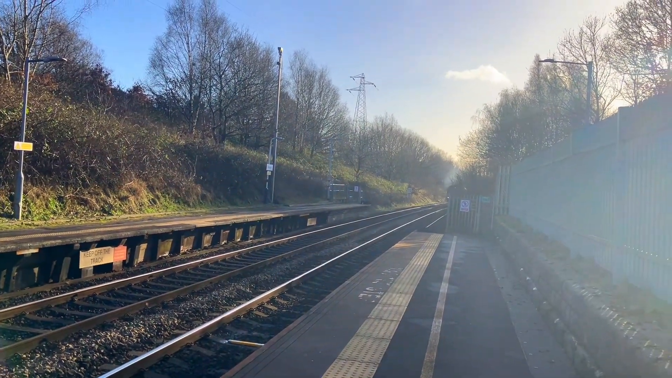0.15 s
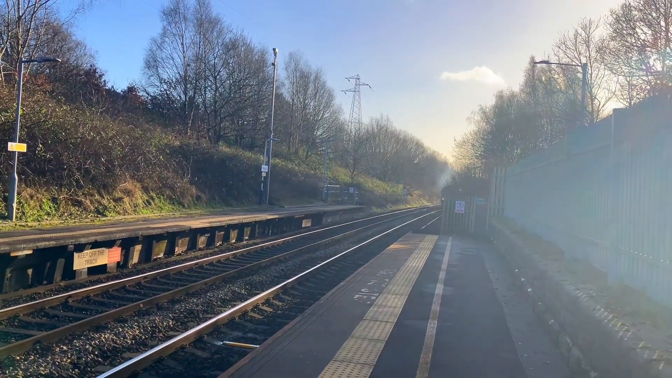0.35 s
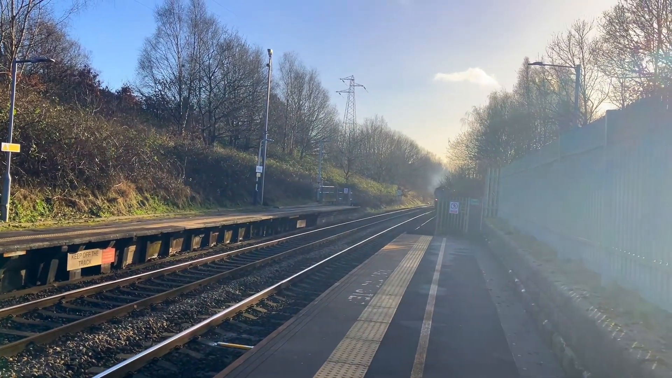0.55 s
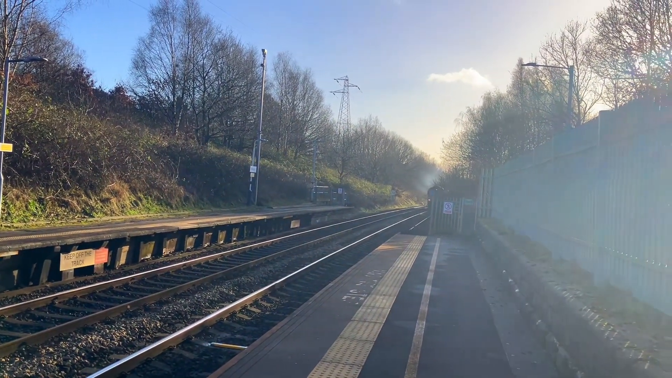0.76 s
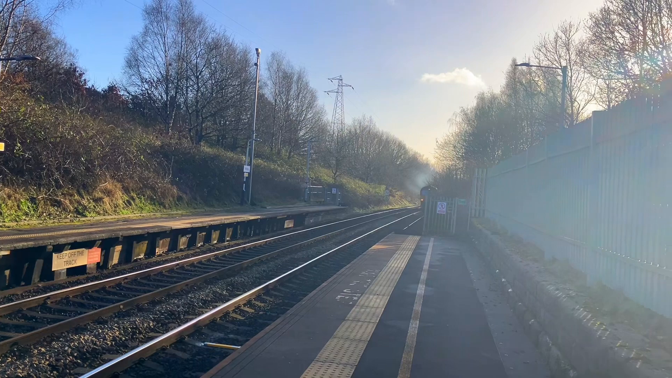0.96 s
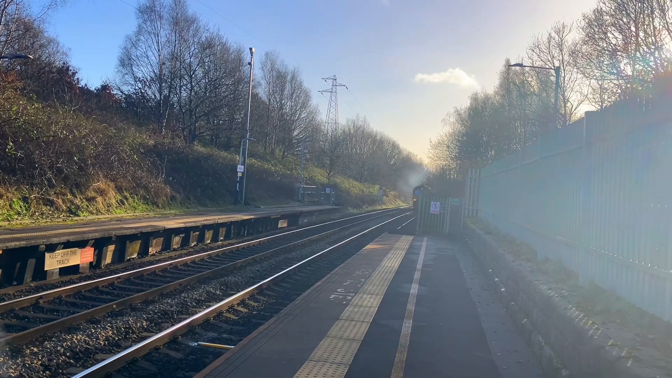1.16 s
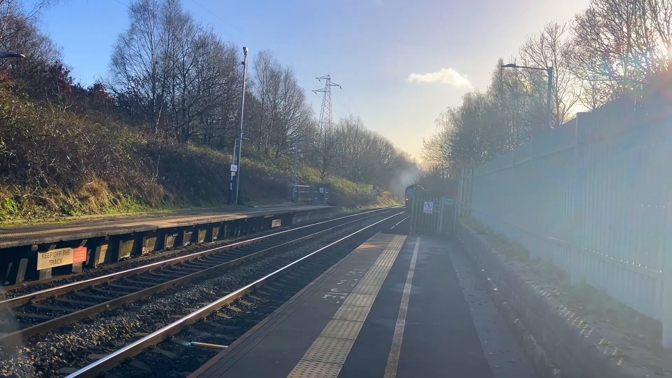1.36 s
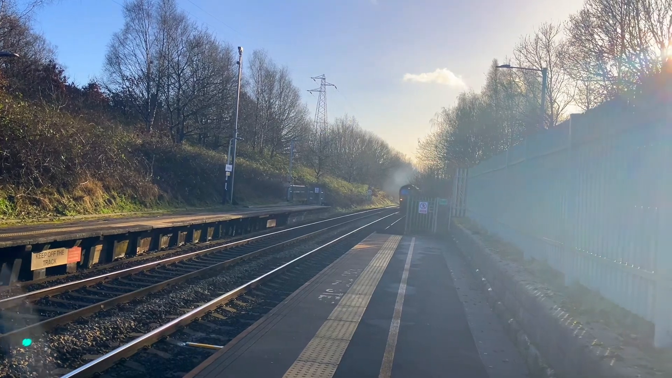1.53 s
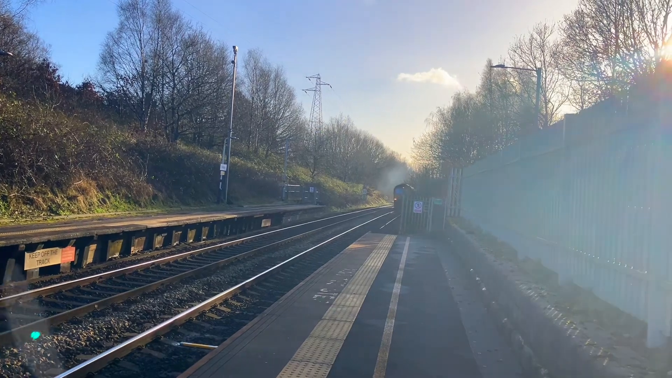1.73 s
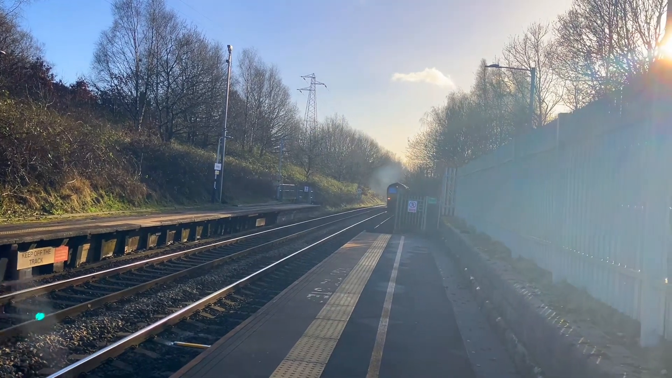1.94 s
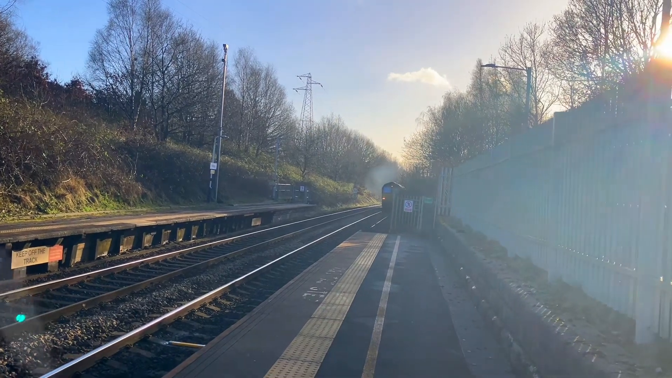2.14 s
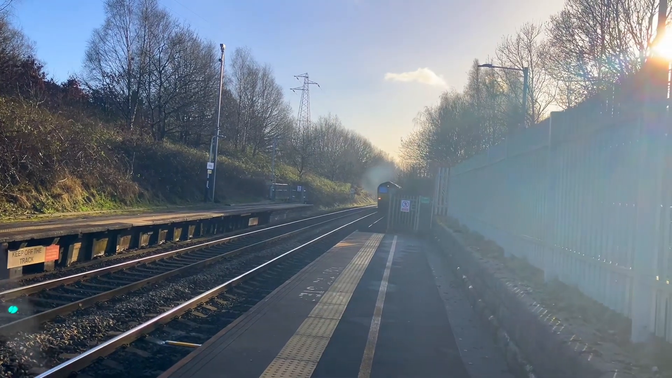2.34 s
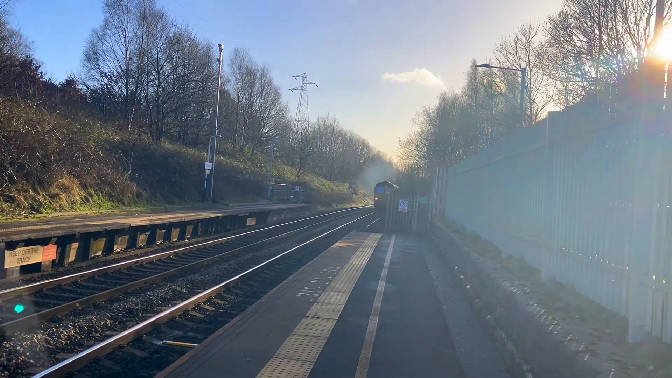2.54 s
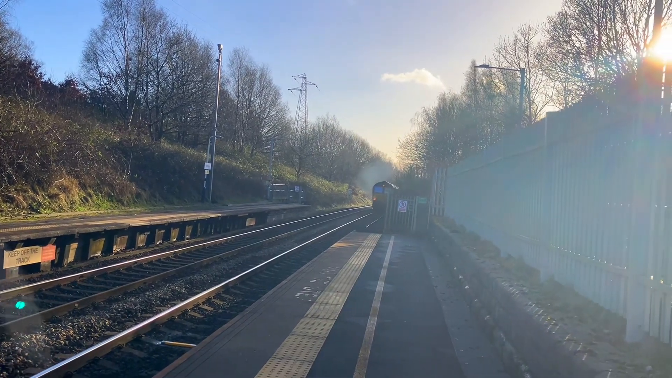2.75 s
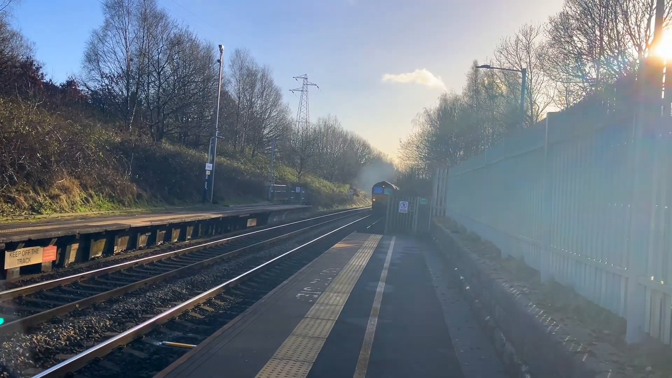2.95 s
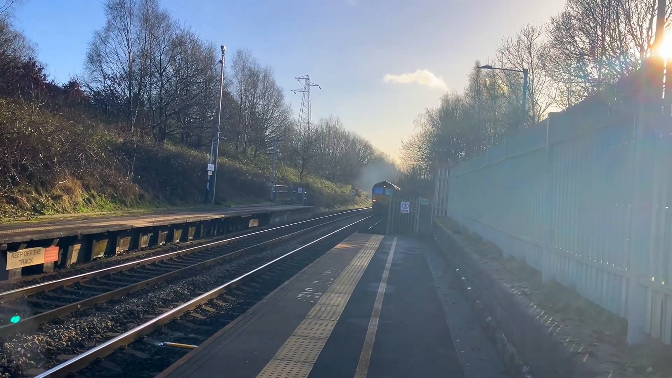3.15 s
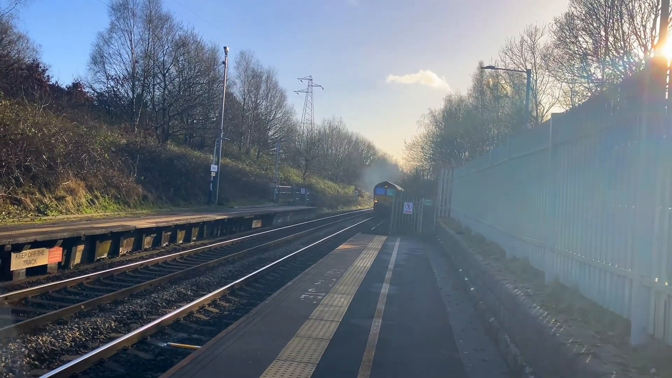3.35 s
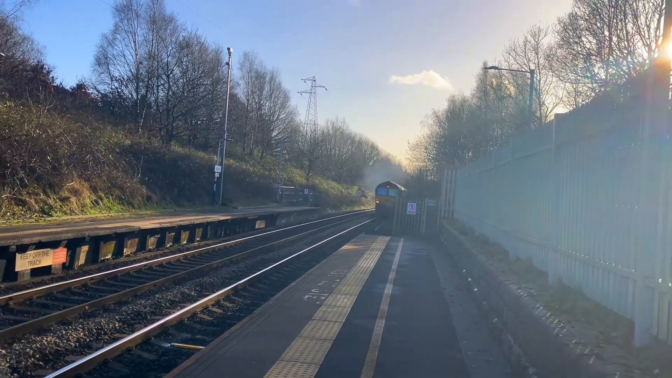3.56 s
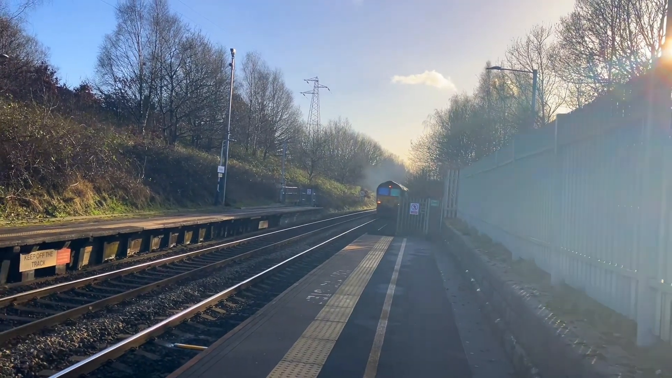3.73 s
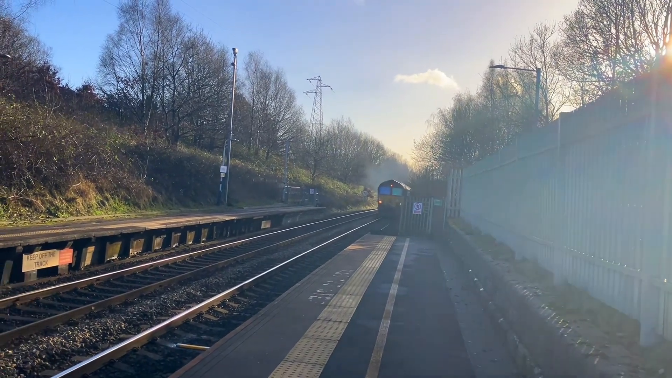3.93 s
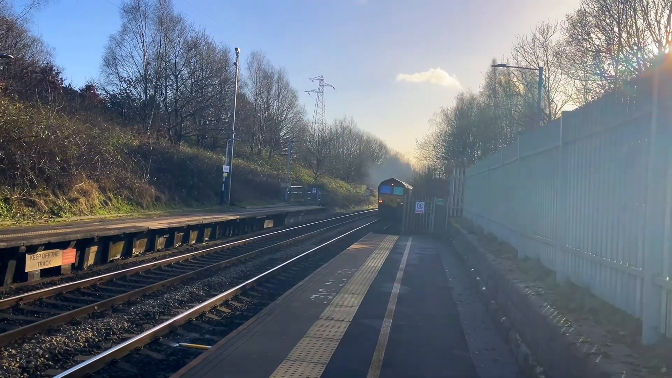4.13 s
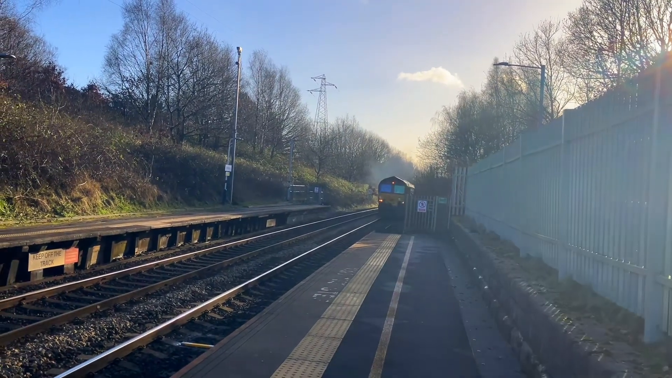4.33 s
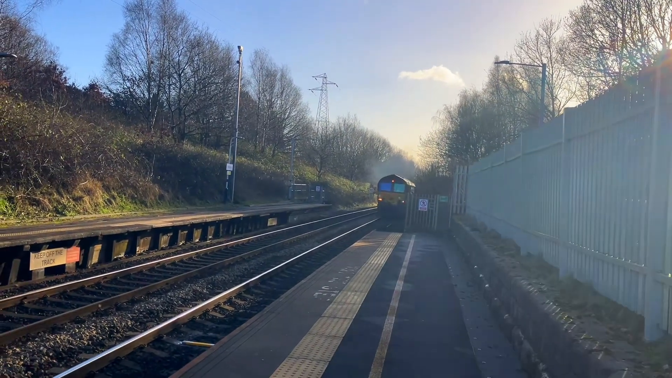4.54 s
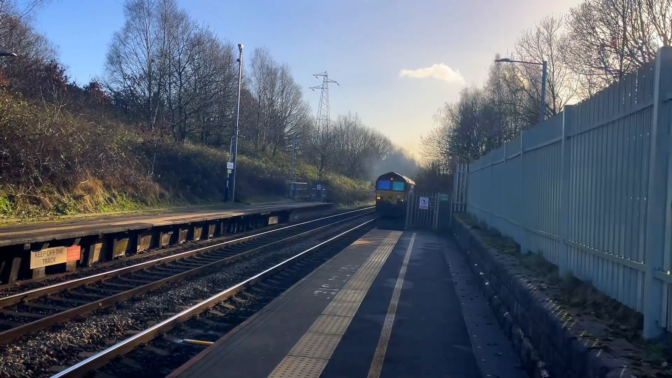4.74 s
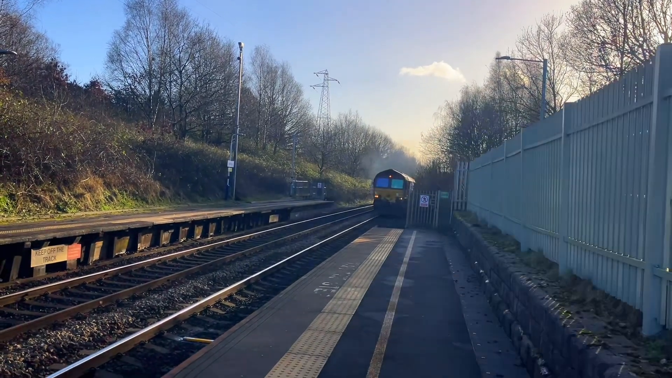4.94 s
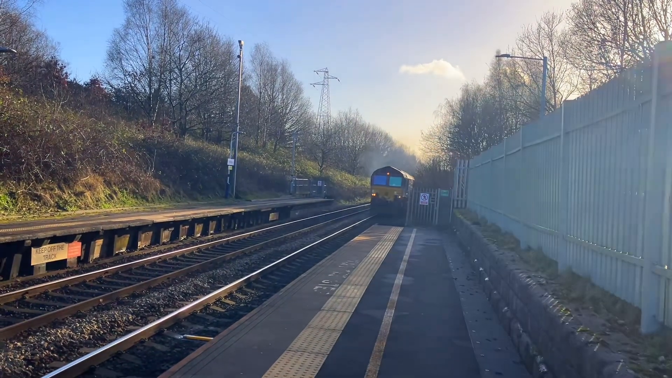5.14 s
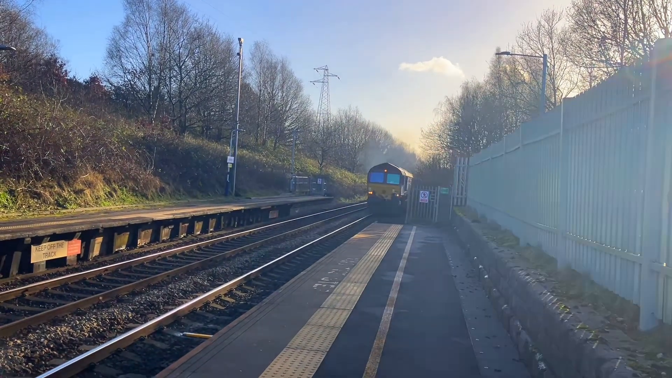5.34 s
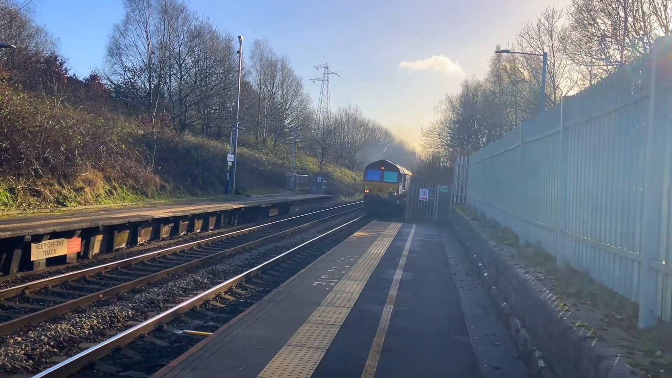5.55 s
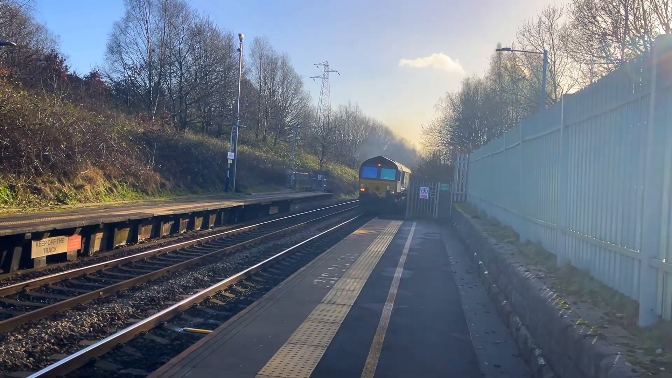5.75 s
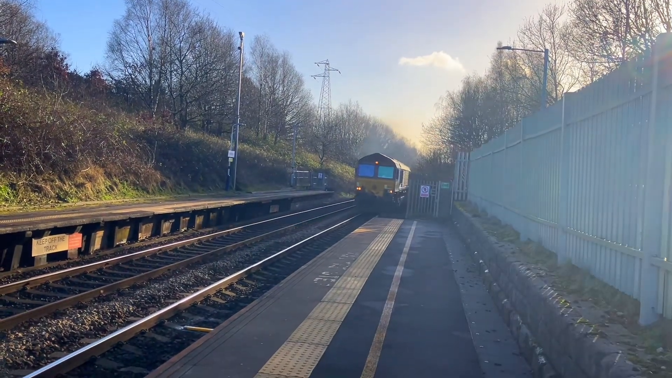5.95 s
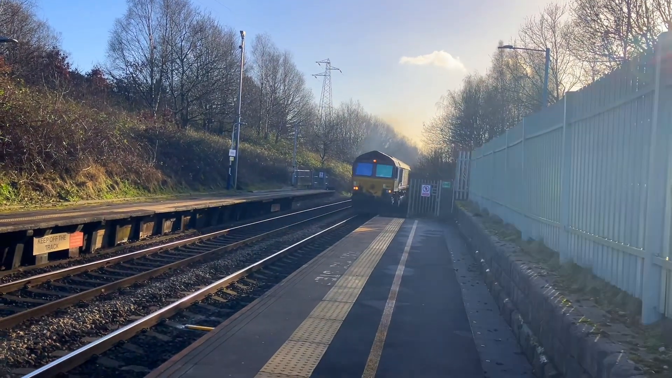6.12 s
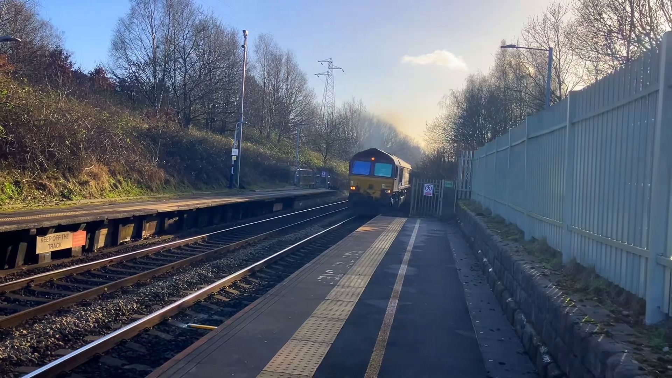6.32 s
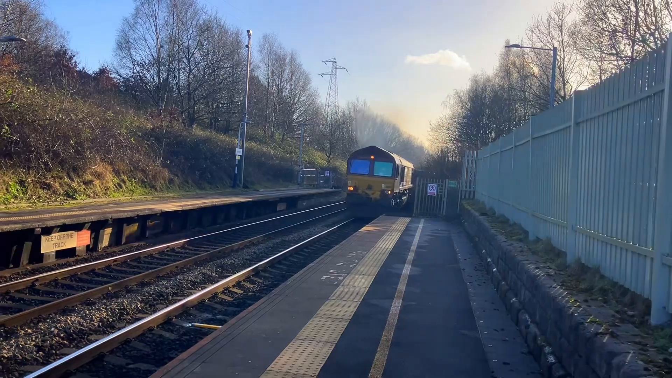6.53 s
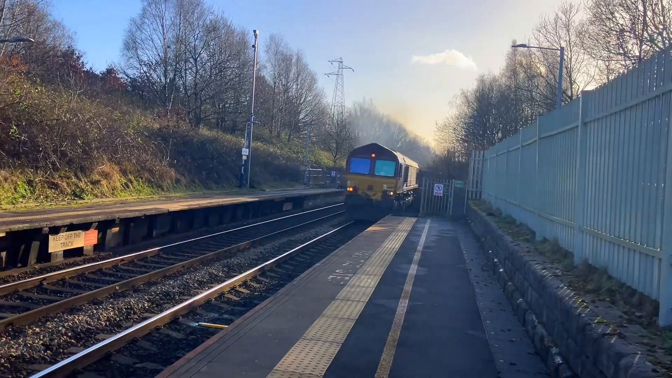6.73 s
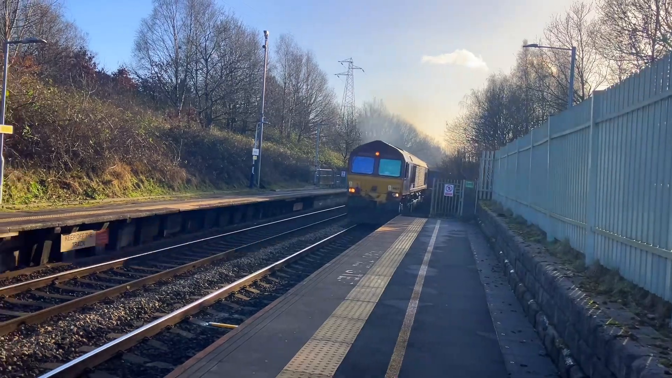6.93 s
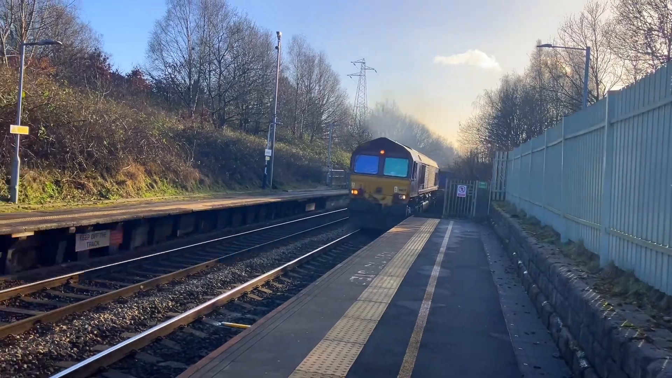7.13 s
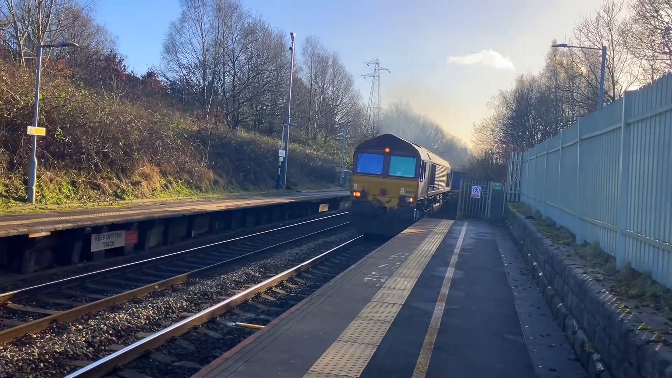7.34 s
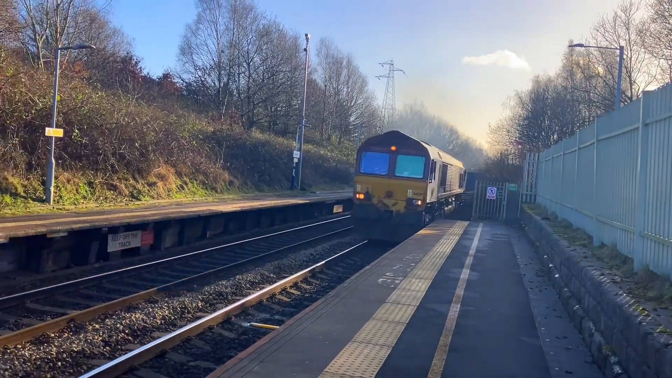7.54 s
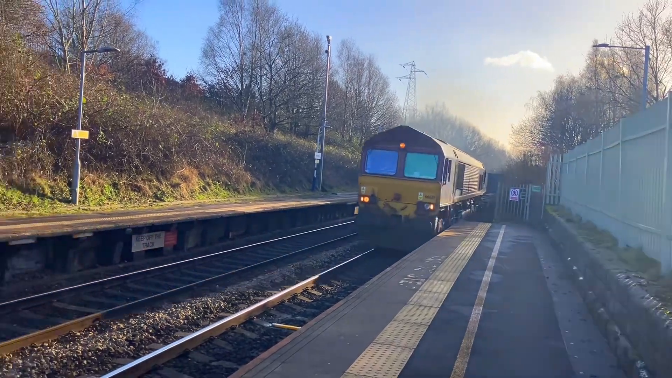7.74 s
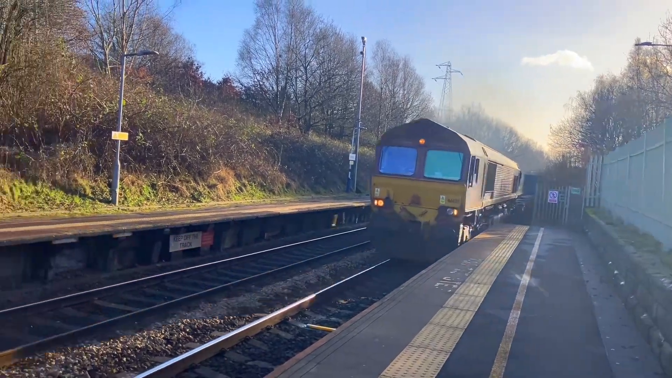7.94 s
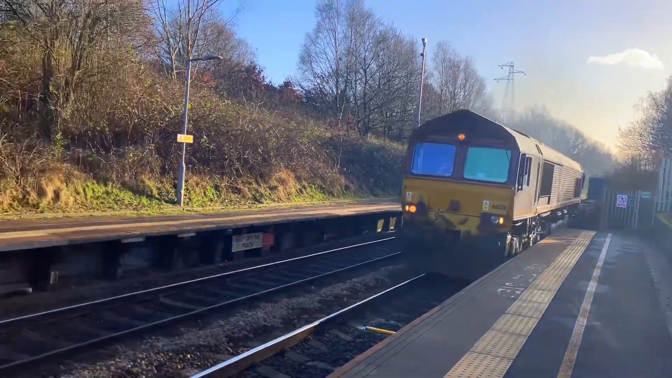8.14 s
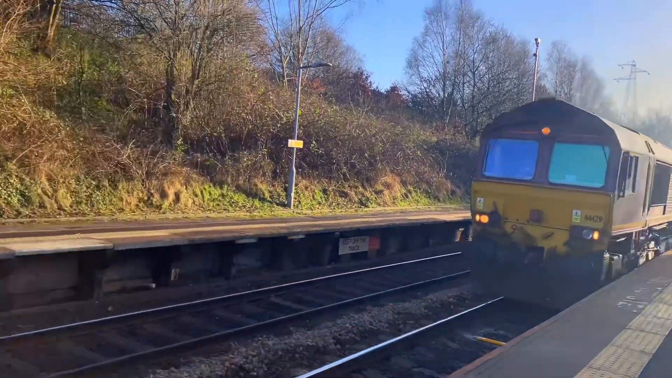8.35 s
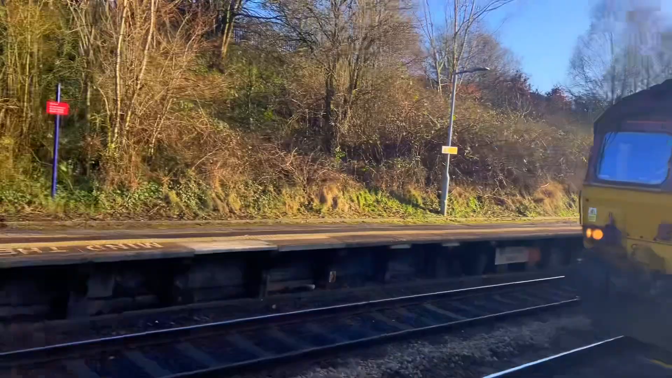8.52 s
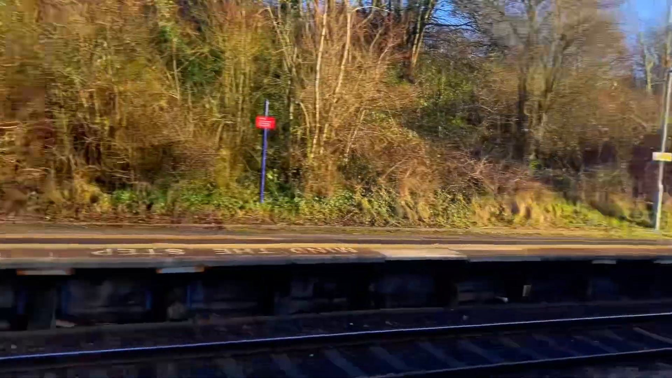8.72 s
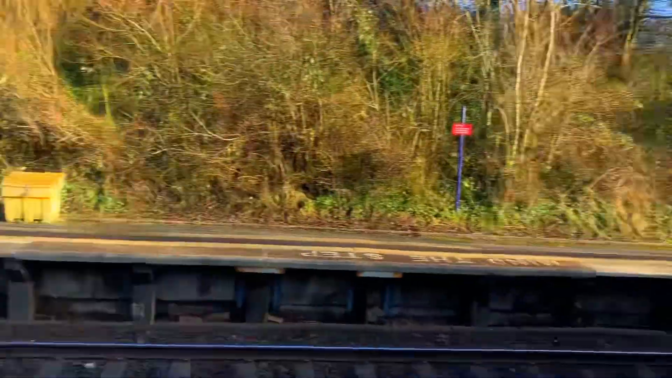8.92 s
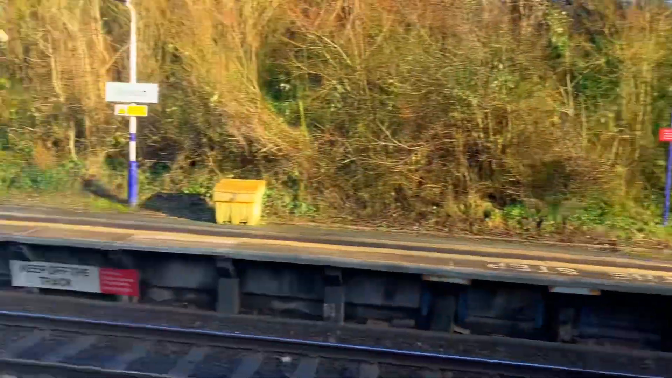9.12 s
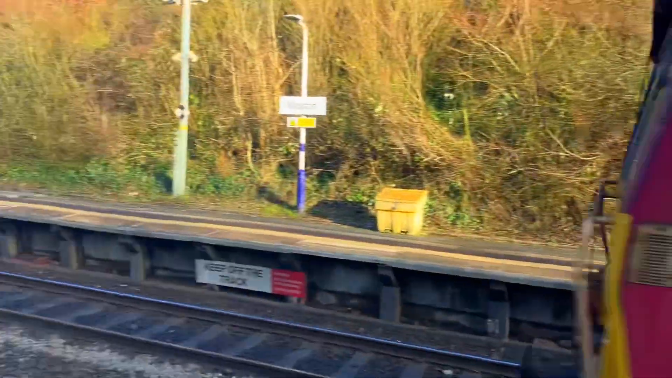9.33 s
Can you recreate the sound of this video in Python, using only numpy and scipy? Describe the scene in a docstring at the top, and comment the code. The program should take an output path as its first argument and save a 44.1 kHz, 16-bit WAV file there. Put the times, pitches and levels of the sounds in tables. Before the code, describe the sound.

A heavy diesel pulls hard toward a handheld stereo microphone on an open platform. It starts quiet and scattered by the banks, a fast low pulsing with soft high rail ringing. Over nine seconds it swells, with unsteady mid-pitched whines, a small spit of air and two tiny ticks. Near the end a soft low gust, rough wheel roar, grinding and sizzling hiss surround the powerful bass drone as it passes.

```python
"""A two-stroke diesel freight locomotive, pulling hard, runs through a cutting up to a phone on a platform.
Its exhaust throbs once per crank turn: a sum of waves at multiples of the crank rate over a gas rumble.
The blower, gears and high whines are unsteady tones; wheels, bogies and cooling fans are shaped noise.
Singing rails, steady hums, brief tone swells, a gust, a spit of air and small ticks add detail.
Far off the banks scatter the sound; close by it grows brighter and swings to the right."""
import sys
import numpy as np
from scipy import signal
from scipy.fft import rfft, irfft
from scipy.io import wavfile
from scipy.ndimage import uniform_filter1d, minimum_filter1d, map_coordinates

SR = 44100
rng = np.random.default_rng(int(sys.argv[2]) if len(sys.argv) > 2 else 0)


def bounce(signal):
    """Save signal as a 16-bit WAV file at the path given by the first command-line argument."""
    frames = np.transpose(np.atleast_2d(signal))
    limited = np.clip(frames, -1, 1)
    pcm = np.round(limited * 32767).astype(np.int16)
    wavfile.write(sys.argv[1], SR, pcm)


N = 413658
T = np.arange(N) / SR  # time of each sample, s
FREQS = np.arange(N // 2 + 1) * SR / N  # frequencies of the spectrum, Hz

# In all spectra the level is relative: the noise made from them is scaled to rms 1.
# exhaust waves heard from ahead and from the side, before scaling to total power 1: crank order, level/dB
EXHAUST_AHEAD = [(2, -22), (3, -11.5), (4, -5.5), (5, 0), (6, -1), (7, -23.5), (8, -18), (9, -6),
                 (10, -13.5), (11, -28), (12, -12)]
EXHAUST_BESIDE = [(2, -38), (3, -18), (4, -13), (5, -3.5), (6, -2), (7, -2.5), (8, -14), (9, -9.5),
                  (10, -12), (11, -17), (12, -24)]
# one exhaust wave booms out or sinks in the cutting: t/s, length/s, crank order, change of level/dB
EXHAUST_BOOMS = [(0.33, 0.37, 5, 2), (6.5, 1.45, 6, 4.5), (6.36, 0.88, 7, 21), (6.2, 0.95, 5, -7),
                 (6.3, 0.78, 8, -5), (6.99, 0.96, 9, 10), (8.28, 0.43, 5, 7), (9.25, 0.17, 7, 5.5)]
# loudness of the exhaust throb over time: t/s, level/dB
THROB_LEVEL = [(0, -34), (0.45, -33), (0.9, -31.5), (2.5, -30.5), (3.3, -29), (4.25, -26), (4.45, -28.5),
               (4.7, -24), (5.3, -22.5), (5.7, -22.5), (6.05, -21.5), (6.45, -23), (6.9, -18), (7.5, -17.5),
               (8.4, -14), (8.6, -17), (9.05, -8.5), (9.38, -9)]
# single turns that fire harder or weaker: t/s, change of level/dB
FIRING_SURGES = [(.45, -7), (1.0, 1.5), (1.6, 0.5), (2.63, 2.5), (3.69, 1.5), (4.68, 3), (6.02, 0),
                 (8.81, -3.5)]
# spectrum of the exhaust's gas rumble: f/Hz, level/dB
GAS_RUMBLE = [(15, -36), (28, -23), (42, 0.5), (70, 12), (100, 9.5), (150, -2), (220, -4.5), (400, -129)]
# spectrum of the exhaust's rasp: f/Hz, level/dB
EXHAUST_RASP = [(90, 0.5), (150, 0.5), (220, 6), (350, 2), (420, -7.5), (600, -8.5), (1200, -93.5)]
# partials of the blower: multiple of its pitch, relative level/dB
BLOWER_PARTIALS = [(1, 3.5), (2, -8), (3, -16.5), (3.5, -24), (4, -12.5)]
# pitch of the blower as heard, sinking as it draws near: t/s, f/Hz
BLOWER_PITCH = [(0, 296.1), (6.4, 296.1), (7.5, 294.8), (8.2, 293.2), (9.38, 292.4)]
# loudness of blower, gears and the two thin whines over time: t/s, level/dB
BLOWER_LEVEL = [(0, -52), (2.8, -53.5), (4.4, -43.5), (5.25, -37.5), (5.55, -42), (5.8, -36), (6.5, -35.5),
                (6.8, -38.5), (7.15, -33.5), (7.602, -34), (7.92, -25.5), (8.12, -33), (8.35, -29.5),
                (8.67, -18.5), (8.79, -26.5), (9.05, -18), (9.38, -31)]
GEAR_LEVEL = [(0, -62), (2.7, -58), (3.1, -55), (4.6, -57), (5.0, -43.5), (5.4, -46.5), (5.85, -52),
              (6.2, -42), (6.45, -49), (6.8, -39.5), (7.521, -35.5), (7.65, -38), (7.82, -32.5),
              (8.15, -32), (8.42, -38.5), (8.7, -31), (9.1, -32), (9.38, -33)]
LOWER_WHINE_LEVEL = [(0, -68), (3.05, -67), (3.28, -57), (3.55, -58), (3.63, -66), (3.72, -55), (3.85, -50),
                     (3.92, -56), (4.03, -51.5), (4.25, -62), (6, -64), (8, -51), (9.38, -49)]
UPPER_WHINE_LEVEL = [(0, -78), (1.3, -66), (2.6, -68), (3.0, -57.5), (3.5, -56), (3.8, -71), (4.6, -68),
                     (4.9, -58), (5.9, -54), (6.4, -58), (8.5, -44), (9.38, -48)]
# steady narrow hums beneath the engine, some from small machines, some near multiples of the blower's pitch
# or the crank rate: f/Hz, width/Hz, level alongside/dB
STEADY_HUMS = [(51.4, 2, -26), (166.5, 2, -35), (223.9, 2.8, -30.5), (270.4, 3, -35.5), (335.6, 5.2, -37),
               (426, 8.7, -40.5), (663, 4.6, -44), (1028, 5, -43)]
# spectrum of the wheels' roar: f/Hz, level/dB
WHEEL_ROAR = [(250, 0.5), (430, -6), (600, 2.5), (850, 0), (1150, 2), (1450, -3), (1800, -8.5), (2400, -31),
              (5000, -78)]
# spectrum of the bogies' rumbling and grinding: f/Hz, level/dB
BOGIE_RUMBLE = [(180, -38), (330, 13), (450, 16), (580, 11.5), (800, -9), (1500, -11), (2050, -4.5),
                (3200, -23), (6000, -60)]
# spectrum of the air from the cooling fans: f/Hz, level/dB
FAN_HISS = [(900, -2.5), (1900, 0), (2400, 1.5), (3200, -1), (4200, -1.5), (5400, -7.5), (7300, -10),
            (12000, -31), (16000, -38)]
# narrow high rings in the fan hiss, several near blower overtones: f/Hz, width/Hz, level against the hiss/dB
HISS_RINGS = [(2352, 60, -17), (2649, 35, -22), (3240, 110, -19), (3811, 25, -25), (4232, 50, -21)]
# spectrum of the wheel treads' sizzle: f/Hz, level/dB
TREAD_SIZZLE = [(3500, -28), (5500, -6), (7300, -3), (10300, 5.5), (12000, 13.5), (13200, -19),
                (16000, -14)]
# brief swells of single tones, mostly blower overtones: t/s, length/s, f/Hz, width/Hz, level/dB
TONE_SWELLS = [(7.85, .11, 1184, 6, -38), (8.15, .14, 1168, 8, -39), (8.08, .08, 4170, 90, -40.5),
               (8.12, .22, 354, 12, -30), (8.3, .22, 1030, 8, -41), (8.35, .08, 586, 8, -33),
               (8.58, .12, 1176, 8, -40), (8.95, .1, 1170, 6, -30.5), (9.05, .4, 3812, 10, -43),
               (9.1, .18, 1030, 8, -37), (9.22, .2, 578, 12, -32)]
# rails singing ahead of the wheels: f/Hz, width/Hz, level/dB
RAIL_MODES = [(1086, 340, -54.5), (2020, 24, -61.5), (2300, 70, -78), (3000, 380, -67), (4230, 840, -70.5),
              (6700, 240, -80)]
# spectrum of the gust pushed aside by the nose: f/Hz, level/dB
NOSE_GUST = [(18, -26), (35, 1), (48, 0), (80, -15), (200, -60)]
# spectrum of the compressed air: f/Hz, level/dB
COMPRESSED_AIR = [(2000, -29), (4200, 8), (5500, 5), (7200, 2.5), (11800, -1.5), (13500, -14), (16000, -12)]
# small dry ticks near the phone: t/s, level before the left/right balance/dB
DRY_TICKS = [(1.9194, -45), (3.6955, -36)]

# steady speed on a straight track; the nose passes first, the engine follows behind it
SPEED_M_S, TRACK_M, NOSE_PASSES_S, ENGINE_BEHIND_M = 9, 4, 9.15, 11.3
# a long source stops growing louder within about its length: whole body, cooling fans
BODY_M, FAN_BANK_M = 19.2, 12.1
# crank rate as heard head-on; how late the left port hears a sound from the side
CRANK_HZ, PORT_LAG_MS = 14.155, .31
# sine of the bearing the phone faces; bass and middle bend round its body, so the lag is multiplied by these
AIM, BASS_LAG, MID_LAG = 0.08, 1.9, 0.93
# each layer: level alongside (dB), loss per doubling of distance (dB)
RASP_DB, RASP_LOSS_DB = -16, 14
WHEEL_DB, WHEEL_LOSS_DB = -21, 11.5
BOGIE_DB, BOGIE_LOSS_DB = -22, 18
FAN_DB, FAN_LOSS_DB = -24, 9
SIZZLE_DB, SIZZLE_LOSS_DB, SIZZLE_SCATTER_DB = -39.5, 17.5, -9
HUM_LOSS_DB = 10.5
# gas rumble against the exhaust waves: alongside (dB), gain per doubling of distance (dB)
RUMBLE_DB, RUMBLE_RISE_DB = -8.5, 2.4
SURGE_S = .03
# the silencer draws each blast out, high orders first: centre (crank order), spread (rad per order squared)
SILENCER_ORDER, DISPERSION = 5.5, .175
# further spread alongside, where the chugs merge into a drone (rad per order squared)
BESIDE_DISPERSION = .55
# thin whines: the lower has its own pitch (Hz), the upper is a multiple of the blower's
WHINE_HZ, WHINE_MULTIPLE = 2035, 8
# single events: time, length, level
BUFFET_S, BUFFET_LENGTH_S, BUFFET_DB = 8.8, .2, -23
SPIT_S, SPIT_LENGTH_S, SPIT_DB = 7.01, 0.14, -42
# bass lost by the phone's microphone, and the upper limit of its sound
LOW_CUT_HZ, TOP_HZ = 26, 15700


def exhaust(turn, lag_ms, far, beside, smear=0.34, rough=0.094, fade_db=0.6, beside_lead=0.298):
    """Unequal cylinders give a wave on every crank order; together they chug once a turn, over gas rumble."""
    lead = beside_lead * beside ** 2  # from the side the throb comes earlier in the turn
    waves = 0
    for order, gain in enumerate(exhaust_gains(beside), 2):
        # echoes from the banks make each wave fade and shift slowly
        size = gain * undb(fade_db * walk(2.554))
        above = order - SILENCER_ORDER
        delay_spread = (DISPERSION + BESIDE_DISPERSION * beside ** 3) * above ** 2
        phase = 2 * np.pi * (order * turn + above * lead) + delay_spread
        waves = waves - np.sqrt(2) * size * np.cos(phase + smear * walk(0.673))
    waves = waves * (1 + rough * walk(20))  # no two turns burn alike
    # from afar more of the exhaust arrives as a scattered rumble
    share = undb(RUMBLE_DB + RUMBLE_RISE_DB * far)
    rumble = share * spread(GAS_RUMBLE, lag_ms, -10.5)
    mix = (ports(waves, lag_ms) + rumble) / np.hypot(1, share)
    surge_db = sum(db * np.exp(-((T - s) / SURGE_S) ** 2) for s, db in FIRING_SURGES)
    return mix * undb(curves(THROB_LEVEL)[0] + surge_db)


def exhaust_gains(beside, turn_over=1.75):
    """Strength of each crank order, total power 1: it changes as the side comes into view; some orders boom."""
    ahead_db = np.array(EXHAUST_AHEAD)[:, 1]
    beside_db = np.array(EXHAUST_BESIDE)[:, 1]
    share = beside ** turn_over
    db = np.outer(ahead_db, 1 - share) + np.outer(beside_db, share)
    for s, length, order, boom_db in EXHAUST_BOOMS:
        row = int(round(order)) - 2  # the first row is order 2
        db[row] += boom_db * np.exp(-((T - s) / length) ** 2)
    gains = undb(db)
    return gains / np.sqrt(np.sum(gains ** 2, axis=0))


def rasp(turn, lag_ms, buzz_db=-5.0, gas_db=-3.0):
    """The sharp edges of the firings buzz on the higher orders, with a puff of gas for each cylinder."""
    hz, db = np.transpose(EXHAUST_RASP)
    buzz = 0
    for order in range(13, 31):
        size = undb(np.interp(order * CRANK_HZ, hz, db) + 3.5 * walk(1.266))
        phase = 2 * np.pi * (order * turn + rng.random()) + 0.79 * walk(3)
        buzz = buzz + size * np.cos(phase)
    firings = 12 * turn  # twelve firings per crank turn
    gas = patchy(spread(EXHAUST_RASP, lag_ms, -24.5), depth_db=2.5)
    gas = gas * throb(turn, 0.2) * throb(firings, 0.25)
    return undb(buzz_db) * ports(unit(buzz), lag_ms) + undb(gas_db) * gas


def blower(blades):
    """The blower hums at its own pitch with several partials; the higher ones are less steady."""
    hum = sum(undb(db) * tone(k * blades, min(k, 2)) for k, db in BLOWER_PARTIALS)
    return unit(hum) * undb(curves(BLOWER_LEVEL)[0])


def gears(turn, gear_ratio=95.95):
    """The timing gears sing at a fixed ratio to the crank."""
    return tone(gear_ratio * turn, 0.46) * undb(curves(GEAR_LEVEL)[0])


def whines(blades):
    """Two thin high whines: one of steady average pitch, one tied to the blower."""
    lower = tone(WHINE_HZ * T + 0.33 * walk(18), 1.2, flutter_db=0.8)
    upper = tone(WHINE_MULTIPLE * blades + 0.088 * walk(20), 0.43)
    return lower * undb(curves(LOWER_WHINE_LEVEL)[0]) + upper * undb(curves(UPPER_WHINE_LEVEL)[0])


def steady_hums(far, lag_ms):
    """Narrow hums of fixed pitch lie beneath the engine, as resonances kept ringing."""
    hum = sum(undb(db) * ring(hz, width) for hz, width, db in STEADY_HUMS)
    return ports(hum * undb(-HUM_LOSS_DB * far), lag_ms)


def wheels(lag_ms, far, flicker_db=.5, near_scatter_db=-5, scatter_rise_db=2.0):
    """Steel rolls on rough rail and roars, scattered by the cutting."""
    roar = patchy(spread(WHEEL_ROAR, lag_ms, near_scatter_db + scatter_rise_db * far), depth_db=2.5)
    return roar * undb(flicker_db * walk(25)) * undb(WHEEL_DB - WHEEL_LOSS_DB * far)


def bogies(beside, lag_ms):
    """The bogies rumble out as they clear the platform edge; the level follows the nose's bearing."""
    return spread(BOGIE_RUMBLE, lag_ms, -21) * undb(BOGIE_DB + BOGIE_LOSS_DB * np.log2(beside))


def fans(distance, far, lag_ms, far_hz=3400, treble_loss_db_per_m=0.16, near_scatter_db=-3, scatter_rise_db=5.0):
    """Cooling air hisses with narrow high rings; from afar it is scattered and the air swallows the treble."""
    hiss = spread(FAN_HISS, lag_ms, near_scatter_db + scatter_rise_db * far)
    rings = sum(undb(db) * np.array([ring(hz, width), ring(hz, width)]) for hz, width, db in HISS_RINGS)
    bright = patchy(hiss + rings, depth_db=2.5, size=1024)
    low_pass = signal.butter(3, far_hz, fs=SR, output="sos")
    dull = unit(signal.sosfiltfilt(low_pass, bright))
    clear = undb(-treble_loss_db_per_m * (distance - distance.min()))
    return (dull * (1 - clear) + bright * clear) * undb(FAN_DB - FAN_LOSS_DB * far)


def sizzle(far, lag_ms, grain_db=3.0):
    """The treads hiss with a fine grit that arrives mostly straight and fades quickly with distance."""
    grit = patchy(spread(TREAD_SIZZLE, lag_ms, SIZZLE_SCATTER_DB), depth_db=0.5, size=512)
    return grit * undb(grain_db * walk(60)) * undb(SIZZLE_DB - SIZZLE_LOSS_DB * far)


def tone_swells(lag_ms):
    """A single tone swells and dies, its pitch wandering; most are blower overtones."""
    swells = 0
    for s, length, hz, width, db in TONE_SWELLS:
        wandering_tone = unit(np.cos(2 * np.pi * hz * T + walk(2 * width)))
        swells = swells + undb(db) * np.exp(-((T - s) / length) ** 2) * wandering_tone
    return ports(swells, lag_ms)


def rails(waver_db=1):
    """The rails carry the wheels' rolling far ahead and sing unevenly."""
    return sum(undb(db + waver_db * walk(9.2)) * ring(hz, width) for hz, width, db in RAIL_MODES)


def buffet(lag_ms):
    """Air pushed aside by the nose reaches the phone as a soft low gust."""
    swell = np.exp(-((T - BUFFET_S) / BUFFET_LENGTH_S) ** 2)
    return spread(NOSE_GUST, lag_ms, -2) * undb(BUFFET_DB) * swell


def air_spit():
    """A valve opens, blows compressed air briefly and shuts."""
    swell = np.exp(-((T - SPIT_S) / SPIT_LENGTH_S) ** 2)
    return spread(COMPRESSED_AIR, 0, 1) * undb(SPIT_DB) * swell


def ticks(decay_s=0.0023):
    """Tiny bright snaps: noise that starts at once and dies away in milliseconds."""
    bursts = sum(undb(db) * (T >= s) * np.exp(-np.abs(T - s) / decay_s) for s, db in DRY_TICKS)
    snap = noise([(3000, -28), (5700, -3), (7000, 9), (9000, -16), (11500, 1), (16000, -16)])
    return bursts * snap * np.array([[.8], [1.2]])  # weaker left, stronger right


def undb(db):
    """Turn decibels into a gain."""
    return 10 ** (np.asarray(db) / 20)


def unit(x):
    """Scale to rms 1."""
    return x / np.sqrt(np.mean(x ** 2))


def curves(rows):
    """Draw each column of a table over time as one value per sample."""
    s, *columns = np.transpose(rows)
    return [np.interp(T, s, c) for c in columns]


def walk(rate):
    """Smooth random wandering of spread about 1 that changes about rate times a second."""
    steps = np.repeat(rng.standard_normal(int(rate * N / SR) + 3), 8)
    steps = uniform_filter1d(uniform_filter1d(steps, size=8), size=5)
    return np.interp((T * rate + rng.random()) * 8, np.arange(len(steps)), unit(steps))


def noise(points):
    """Noise of rms 1 with a spectrum drawn through (Hz, dB) points."""
    hz, db = np.transpose(points)
    gain = undb(np.interp(np.log(FREQS + 1), np.log(hz), db))
    return unit(irfft(rfft(rng.standard_normal(N)) * gain, N))


def ring(hz, width):
    """A resonance kept ringing by random pushes, rms 1."""
    pushes = np.exp(2j * np.pi * rng.random(len(FREQS)))
    return unit(irfft(pushes / (1 + (2 * (FREQS - hz) / width) ** 2), N))


def tone(cycles, unsteady, waver=0.085, flutter_db=2.0):
    """A whine of rms 1 whose phase wavers and whose level flutters a little on its way."""
    phase = 2 * np.pi * cycles + unsteady * (waver * walk(22) + 0.39 * walk(4))
    return unit(undb(unsteady * flutter_db * walk(14)) * np.cos(phase))


def throb(turn, depth):
    """A swell once per whole turn counted, rms 1."""
    return unit(np.exp(depth * np.cos(2 * np.pi * turn)))


def patchy(x, depth_db, size=2048):
    """Shifting echoes strengthen and weaken narrow patches of the spectrum for a moment at a time."""
    frames = signal.stft(x, nperseg=size)[2]
    field = rng.standard_normal(frames.shape[1:])
    field = uniform_filter1d(field, size=3, axis=0)  # smooth over frequency
    field = unit(uniform_filter1d(field, size=4, axis=1))  # smooth over time
    return unit(signal.istft(frames * undb(depth_db * field))[1][:, :N])


def ports(x, lag_ms):
    """Direct sound at the two microphone ports; with a positive lag the left hears it later."""
    return np.array([np.interp(T - lag_ms / 1000, T, x), x])


def spread(points, lag_ms, scatter_db):
    """Noise that arrives partly direct and partly scattered, the scattered part different at each port."""
    scatter = undb(scatter_db)
    direct = noise(points)
    late = map_coordinates(direct, [np.arange(N) - lag_ms * SR / 1000], order=3, mode="nearest")
    scattered = np.array([noise(points), noise(points)])
    return (np.array([late, direct]) + scatter * scattered) / np.sqrt(1 + scatter ** 2)


def place(behind_m):
    """Metres still to go, and straight distance, for a point that far behind the nose."""
    ahead = SPEED_M_S * (NOSE_PASSES_S - T) + behind_m
    return ahead, np.hypot(ahead, TRACK_M)


def doublings(ahead, length_m):
    """How many times the distance to a source of that length has doubled; 0 alongside."""
    return np.log2(np.hypot(ahead, length_m) / length_m)


def scene():
    """The train's position shapes loudness, colour, direction and Doppler shift; the crank paces the engine."""
    ahead, distance = place(ENGINE_BEHIND_M)
    far, fans_far = doublings(ahead, BODY_M), doublings(ahead, FAN_BANK_M)
    beside = TRACK_M / place(0)[1]  # sine of the nose's bearing: 0 head-on, 1 alongside
    lag_ms = PORT_LAG_MS * (beside - AIM) / (1 - AIM)
    bass_lag_ms, mid_lag_ms = BASS_LAG * lag_ms, MID_LAG * lag_ms

    # Doppler shift, with sound travelling at 343 m/s: the pitch sinks as the engine nears the side
    crank_hz = CRANK_HZ * (1 - SPEED_M_S / 343 * (1 - ahead / distance))
    turn = np.cumsum(crank_hz) / SR - .268  # crank turns so far
    blades = np.cumsum(curves(BLOWER_PITCH)[0]) / SR  # blower cycles so far

    body = rasp(turn, bass_lag_ms) * undb(RASP_DB - RASP_LOSS_DB * far)
    body = body + ports(blower(blades) + gears(turn) + whines(blades), mid_lag_ms)
    body = body + steady_hums(far, bass_lag_ms)
    body = body + wheels(mid_lag_ms, far) + bogies(beside, bass_lag_ms)
    # both are a little stronger on the right
    train = exhaust(turn, bass_lag_ms, far, beside) * undb(np.array([[-.3], [.3]]))
    train = train + body * undb(np.array([[-.8], [.8]]))

    air = fans(distance, fans_far, lag_ms) + buffet(bass_lag_ms) + air_spit()
    details = sizzle(fans_far, lag_ms) + tone_swells(mid_lag_ms) + rails() + ticks()
    return train + air + details


def record(dry, ceiling=1.0):
    """The deepest bass is lost, the phone's limiter eases the loudest peaks down, and the top is cut."""
    bass_cut = signal.butter(4, LOW_CUT_HZ, "high", fs=SR, output="sos")
    dry = signal.sosfiltfilt(bass_cut, dry, padtype="even")
    room_left = np.minimum(1, min(ceiling, .97) / (np.abs(dry).max(axis=0) + 1e-9))
    gain = uniform_filter1d(minimum_filter1d(room_left, size=1201), size=1201)
    top_cut = signal.ellip(8, .2, 70, TOP_HZ, fs=SR, output="sos")
    return signal.sosfilt(top_cut, dry * gain)


dry = scene()
out = record(dry)
bounce(out)
```